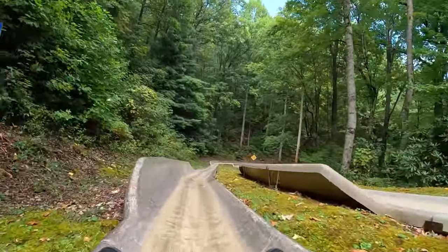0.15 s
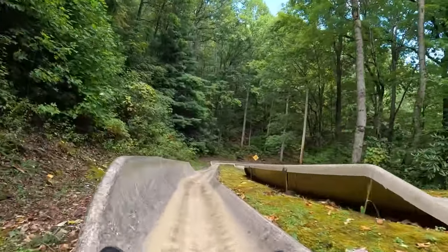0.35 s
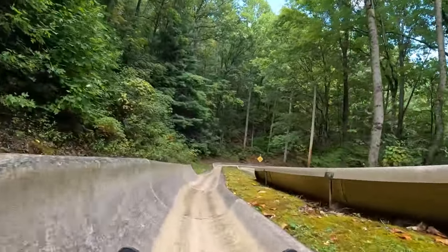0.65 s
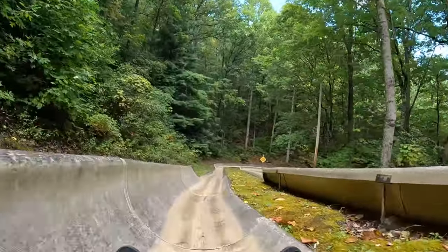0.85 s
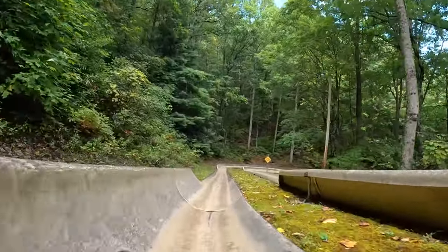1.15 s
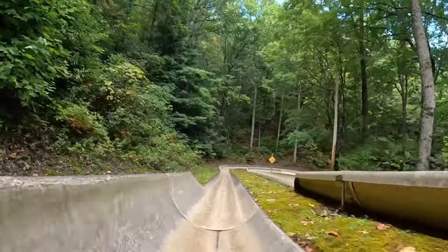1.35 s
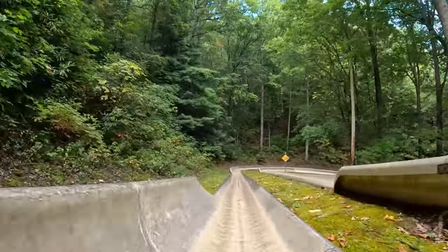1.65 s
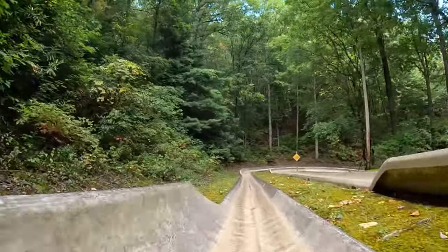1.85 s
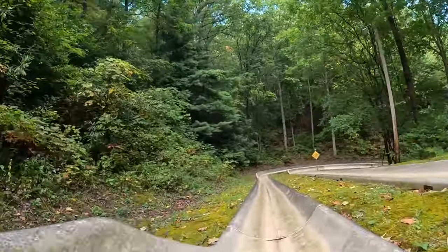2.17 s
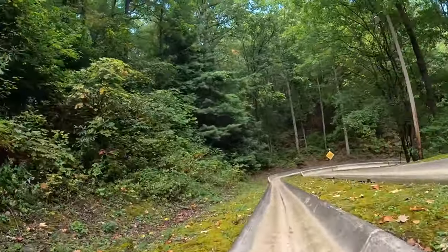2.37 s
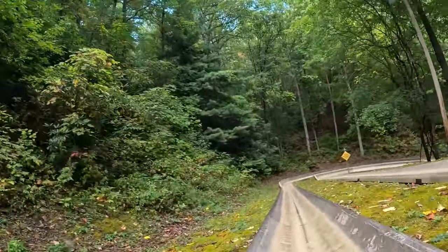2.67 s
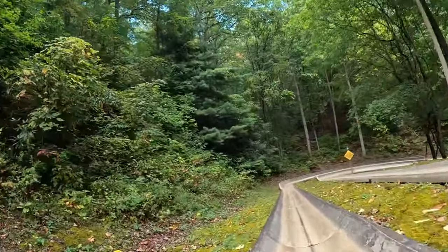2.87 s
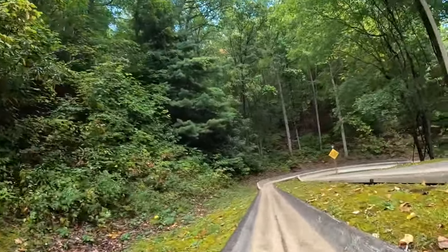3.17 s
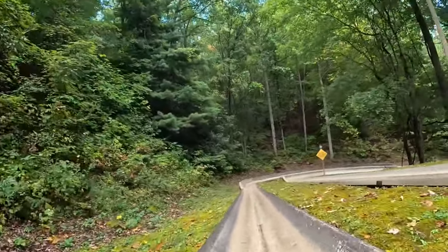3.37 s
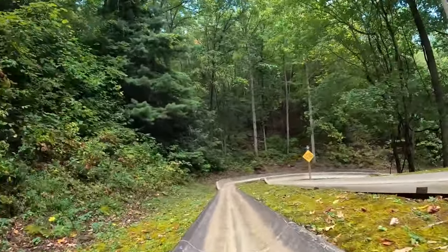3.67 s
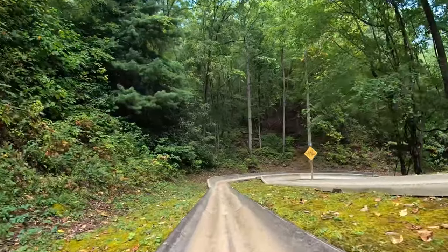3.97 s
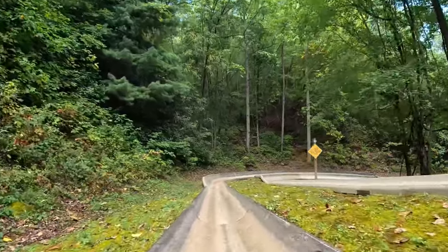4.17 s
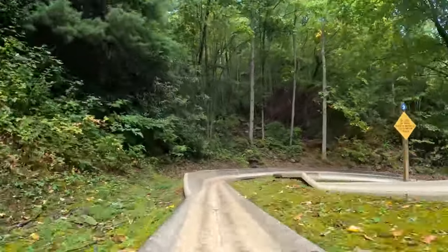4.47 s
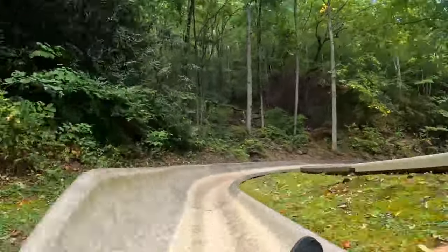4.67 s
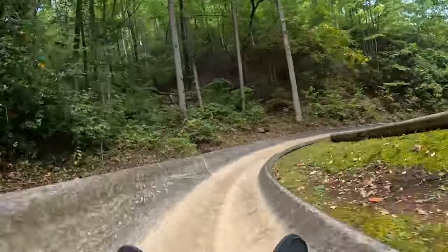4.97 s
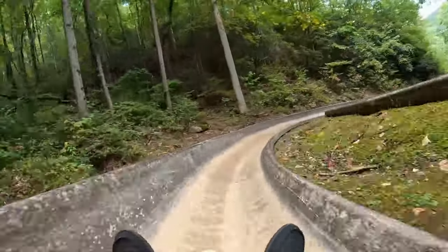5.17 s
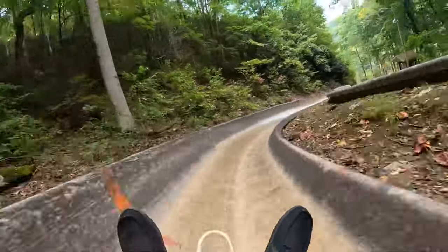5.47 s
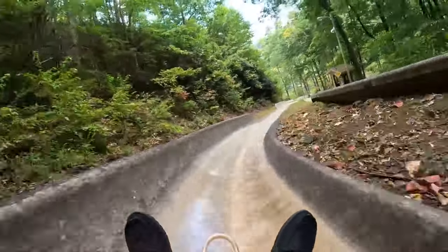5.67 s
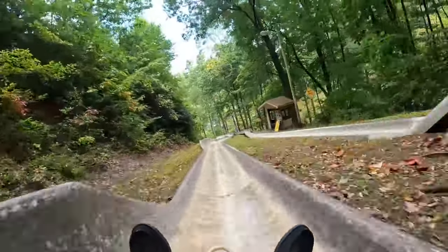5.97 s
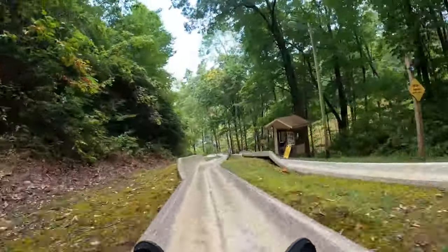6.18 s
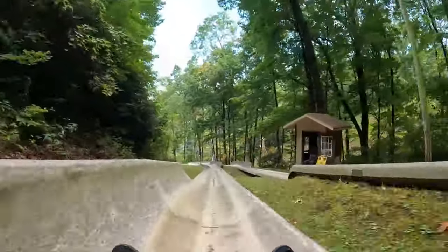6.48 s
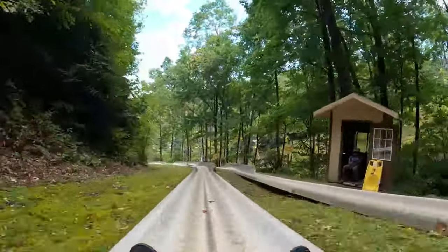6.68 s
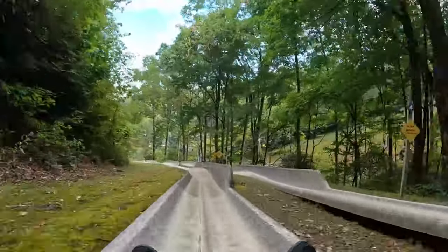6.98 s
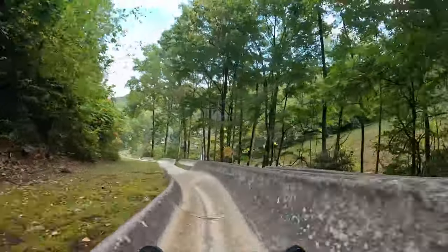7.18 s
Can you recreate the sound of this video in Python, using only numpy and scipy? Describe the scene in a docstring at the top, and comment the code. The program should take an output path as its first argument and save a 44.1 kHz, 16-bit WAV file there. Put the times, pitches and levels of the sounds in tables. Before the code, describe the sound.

Sled wheels roll on rough concrete with a low hollow rumble and a raspy, hissing scrape, picked up by a slightly dull on-board microphone. Hard, uneven thumps and clacks hit as the sled crosses track joints and briefly hops. After a tiny dropout a little past the middle, the ride goes on softer, the bumps shorter and closer together, with a faint phasey swirl between left and right.

```python
"""Wheeled sled in a concrete trough

The wheels rumble through the sled's hollow body, scrape on the gritty surface and bang over the
joints, hopping off the track for a moment after a hard one. A microphone in a housing rides along.
At 4.2 s the sound drops out for an instant. From there it plays sped up, at the same pitch: the cracks
are brighter and patches of the spectrum slip out of phase between left and right."""
import sys
import numpy as np
from scipy import signal
from scipy.fft import rfft, irfft, next_fast_len
from scipy.io import wavfile
from scipy.ndimage import uniform_filter1d

SR = 44100
rng = np.random.default_rng(int(sys.argv[2]) if len(sys.argv) > 2 else 0)


def store_wav(level_fs):
    """Save 16-bit WAV to argv[1]."""
    pcm = np.round(np.clip(np.atleast_2d(level_fs), -1, 1) * 32767)
    wavfile.write(sys.argv[1], SR, pcm.T.astype(np.int16))


N = 323253
TIME_S = np.arange(N) / SR
SPED_UP_FROM_S = 4.2027


def undb(db):
    """Decibels to gain."""
    return 10 ** (np.asarray(db) / 20)


def unit(x):
    """Scale to rms 1."""
    return x / np.sqrt(np.mean(x ** 2))


def curves(table):
    """Interpolate each column after the time column to one value per sample."""
    times_s, *columns = np.transpose(table)
    return [np.interp(TIME_S, times_s, column) for column in columns]


def walk(rate_hz):
    """Random levels, held and smoothed twice; spread near 1."""
    hold = int(SR / rate_hz)
    steps = np.repeat(rng.standard_normal(N // hold + 1), hold)
    return 1.01 * uniform_filter1d(uniform_filter1d(steps, hold), hold)[:N]


def grains(per_s, scatter_db):
    """Random knocks at rms 1; positive scatter makes a few much larger than the rest."""
    hit = rng.random(N) < per_s / SR
    return unit(hit * rng.standard_normal(N) * undb(scatter_db * rng.exponential(size=N)))


def soften(x, hz):
    """A soft contact spreads each push in time and loses the treble."""
    return signal.lfilter(*signal.butter(2, hz, fs=SR), x)


def ring(x, modes, tilt_db=0, width_scale=1):
    """Parallel resonances of alternating sign; tilt_db adds to each one's level."""
    tilt_db = np.broadcast_to(tilt_db, (len(modes), len(x)))
    out = np.zeros(len(x))
    for k, (hz, width_hz, db) in enumerate(modes):
        resonance = signal.iirpeak(hz, hz / width_hz / width_scale, SR)
        out += (-1) ** k * undb(db + tilt_db[k]) * signal.lfilter(*resonance, x)
    return out


def add(out, start_s, sound, db, window_s):
    """Mix in a sound with its loudest window at db rms."""
    start = int(start_s * SR)
    peak_power = uniform_filter1d(sound ** 2, int(window_s * SR)).max()
    out[start:start + len(sound)] += undb(db) * sound / np.sqrt(peak_power)


# Hollow body modes and the higher growl. Each row: frequency in Hz, width in Hz, level in dB.
BODY_MODES = [(98.4, 71, -13), (137.4, 62, -4.5), (179.2, 22, 0), (213.3, 23.3, 0.5), (259.4, 31.3, -1),
              (306.1, 23.1, 0), (357, 50, 0.5), (410.3, 124, -3.5), (525.5, 61, -4)]
GROWL_MODES = [(619.5, 117, -1), (778, 192, 2), (890, 334, -1)]
# Steady rolling. Each row: time in seconds, body in dB, growl in dB, scrape in dB, hiss in dB re scrape.
ROLLING_LEVELS = [(0, -26.5, -34, -34, -7), (.14, -26.5, -31.5, -34.5, -8), (.38, -27, -28.5, -34, -8),
                  (.8, -26.5, -34, -37.5, -9.5), (1.1, -28, -31.5, -37.5, -4),
                  (1.27, -22, -30.5, -36.5, -13.5), (1.6, -27.5, -35, -38.5, -7.5),
                  (1.85, -22, -28.5, -35, -9), (2.3, -28.5, -34, -40.5, -5.5),
                  (2.6, -26.5, -32, -34.5, -6.5), (3.0, -28, -32.5, -37, -9.5),
                  (3.6, -22, -31.5, -34.5, -8), (3.82, -25, -33.5, -35, -8.5),
                  (3.98, -23, -28.5, -27.5, -12), (4.2, -20, -32.5, -35, -6), (4.25, -30, -39, -43.5, -12),
                  (4.9, -31.5, -32, -42.5, -10), (5.3, -30, -41.5, -42, -9.5),
                  (5.7, -28.5, -36.5, -39.5, -9), (6.0, -30, -35.5, -39, -9.5),
                  (6.22, -29.5, -33, -33.5, -11), (6.32, -29.5, -36, -41.5, -10),
                  (6.6, -32.5, -38, -44, -7.5), (7.0, -26, -32.5, -41.5, -6.5),
                  (7.33, -26.5, -35, -34, -13)]


def rumble(roughness):
    """Small surface steps knock the body and feed the growl; the body rolls harder after a thud."""
    body_db, growl_db, _, _ = curves(ROLLING_LEVELS)
    knocks = grains(per_s=900, scatter_db=1.2) * undb(1.6 * roughness + 1.1 * walk(30))
    knocks = soften(knocks, hz=1260)
    rebound = undb(-16) * swell(THUD_COLUMN, rise_s=0.0042, fall_s=0.024)
    body_gain = undb(body_db + 0.31 * hop_db()) + rebound
    growl_gain = undb(growl_db + 0.82 * hop_db())
    return body_gain * unit(ring(knocks, BODY_MODES)) + growl_gain * unit(ring(knocks, GROWL_MODES))


# Resonances of the scrape and its hiss. Each row: frequency in Hz, width in Hz, level in dB.
GRIT_MODES = [(1507, 485, 3.5), (2050, 374, 6.5), (2404, 590, 3.5), (3494, 760, 3.5), (4400, 2110, -8.5)]
HISS_MODES = [(4960, 1140, -2), (7290, 2930, -12.5)]
# Swell of the scrape's ring near 3.5 kHz. Each row: time in seconds, gain in dB.
GRIT_SHINE = [(0, 0.5), (1.05, 1), (1.24, 0), (1.35, 0.5), (2.8, -1), (3.0, 5), (3.1, 1.5), (3.19, 3.5),
              (3.3, 0), (7.33, -1)]


def scrape(roughness):
    """Dense, patchy grit under the wheels: quieter in a hop, louder as they dig in around a crack."""
    _, _, scrape_db, hiss_db = curves(ROLLING_LEVELS)
    grit = grains(per_s=9000, scatter_db=-0.1) * undb(0.21 * roughness + 2.2 * walk(70))
    hiss = unit(unit(ring(grit, HISS_MODES)) + undb(4.5) * grit) * undb(1.4 * walk(14))
    colour_db = 1.26 * np.array([walk(9) for _ in GRIT_MODES])
    colour_db[3] += curves(GRIT_SHINE)[0]
    rasp = unit(ring(soften(grit, hz=6700), GRIT_MODES, colour_db))
    contact = undb(scrape_db + hop_db() + 0.53 * walk(5.4))
    dig_in = undb(-28) * swell(CRACK_COLUMN, rise_s=0.075, fall_s=0.016)
    return (contact + dig_in) * (rasp + undb(hiss_db) * hiss)


# Wheel blows on joints and stones. Each row: time in seconds, thud level in dB, centre in Hz,
# rattle T60 in seconds, crack level in dB.
WHEEL_BLOWS = [(0.189, -17.5, 390, 0.53, -39), (0.296, -21, 296, 0.15, -37), (0.383, -2.5, 330, 0.1, -16),
               (0.498, -3, 301, 0.14, -36), (0.636, -10, 210, 0.2, -34), (0.67, -13, 198, .3, -53),
               (1.162, -23.5, 304, 0.14, -42), (1.199, -12, 416, 0.36, -21.5), (1.243, -25, 400, .1, -25.5),
               (1.288, -4, 242, 0.094, -43), (1.362, -20.5, 400, 0.14, -33), (1.389, -14, 374, 0.16, -26.5),
               (1.435, -6.5, 216, 0.31, -32.5), (1.579, -12.5, 197, 0.41, -45),
               (1.866, -4.5, 328, 0.3, -15.5), (1.873, -10.5, 146, 0.17, -48),
               (1.971, -4.5, 310, 0.14, -33.5), (1.979, -8.5, 335, 0.33, -23),
               (2.041, -15.5, 244, 0.19, -38), (2.098, -6.5, 280, 0.2, -31), (2.104, -10, 115.3, .2, -26.5),
               (2.127, -9, 310, 0.25, -30.5), (2.311, -21.5, 300, 0.079, -36),
               (2.405, -19.5, 287, 0.33, -27), (2.5, -15.5, 243, 0.2, -28.5), (2.611, -15, 448, 0.057, -35),
               (2.699, -1.5, 202, 0.46, -17), (2.825, -4, 175, 0.35, -34), (3.147, -19, 302, 0.12, -31),
               (3.242, -19.5, 350, .08, -34), (3.284, -17, 265, 0.33, -29.5), (3.339, -4, 210, 0.11, -16),
               (3.424, -7.5, 290, 0.053, -50), (3.512, -13, 400, 0.24, -27), (3.555, -8.5, 220, 0.2, -43),
               (3.589, -16, 300, .2, -47), (3.653, -24, 250, 0.3, -27), (3.864, -14.5, 310, 0.77, -36),
               (4.036, -3.5, 314, 0.064, -16), (4.141, -4.5, 312, 0.096, -28), (4.224, -26, 306, 0.18, -48),
               (4.377, -19.5, 297, .1, -38.5), (4.46, -24, 398, .1, -39), (4.544, -12.5, 273, 0.18, -29),
               (4.585, -13, 242, .27, -51), (4.654, -21, 200, .1, -51), (4.684, -9, 254, 0.12, -27),
               (4.739, -12.5, 211, 0.027, -27.5), (4.852, -20.5, 312, 0.12, -32.5),
               (4.878, -16.5, 284, 0.11, -37), (4.897, -16.5, 230, 0.052, -48),
               (5.018, -13, 295, 0.12, -27), (5.042, -28, 308, 0.073, -51),
               (5.059, -14.5, 210, 0.082, -33.5), (5.177, -12, 330, 0.1, -28),
               (5.222, -14, 270, 0.082, -50), (5.319, -27, 284, 0.1, -26.5), (5.335, -18, 252, .1, -35),
               (5.359, -21, 250, 0.073, -51), (5.389, -17, 225, 0.1, -36.5),
               (5.449, -27.5, 280, .08, -38.5), (5.494, -14, 300, 0.1, -35), (5.52, -14, 200, .1, -48),
               (5.551, -21, 280, .1, -40), (5.602, -29, 260, 0.084, -36), (5.704, -13.5, 249, 0.16, -29),
               (5.808, -15, 243, 0.15, -30), (5.826, -17, 260, .06, -41), (5.857, -15.5, 272, .06, -32.5),
               (5.96, -18.5, 330, 0.3, -27.5), (6, -19, 240, .08, -49), (6.034, -34, 300, 0.09, -30),
               (6.085, -23, 300, .1, -32), (6.107, -15, 320, .15, -27.5), (6.134, -20.5, 210, .09, -46),
               (6.145, -21, 230, .09, -49), (6.25, -14, 330, .06, -23), (6.271, -21, 200, 0.06, -47),
               (6.289, -18, 135, .15, -52), (6.387, -14, 360, 0.061, -27.5), (6.411, -18, 233, .1, -55),
               (6.522, -11.5, 330, 0.18, -28), (6.547, -13.5, 199, 0.19, -37.5),
               (6.577, -23.5, 300, 0.068, -44), (6.638, -15.5, 246, 0.056, -43),
               (6.66, -14.5, 210, 0.08, -44), (6.74, -22, 250, .06, -37), (6.762, -15, 290, 0.099, -27),
               (6.777, -20.5, 240, .1, -48), (6.874, -17, 199, 0.19, -39), (6.902, -10.5, 330, 0.052, -32),
               (6.928, -12.5, 260, 0.16, -41), (7.051, -14, 330, 0.08, -34.5), (7.076, -15, 215, 0.16, -45),
               (7.23, -18.5, 226, .12, -52), (7.32, -17, 300, .1, -37)]
THUD_COLUMN, CRACK_COLUMN = 1, 4
FRAME_SWAY = (72, 29, -8.5)  # frequency in Hz, width in Hz, level in dB


def thuds():
    """Each blow is a firm push and a dying rattle that ring the sled's modes near its centre."""
    out = np.zeros(N + SR)
    t = np.arange(SR // 4) / SR
    modes = [FRAME_SWAY] + BODY_MODES + GROWL_MODES
    mode_hz = np.array(modes)[:, 0]
    for at_s, db, centre_hz, t60_s, _ in WHEEL_BLOWS:
        if at_s < SPED_UP_FROM_S:
            rolloff_db, rattle_db, width_scale, lead_s = 7, -3, 0.81, 0.003447
        else:  # shorter and cleaner in the sped-up part
            rolloff_db, rattle_db, width_scale, lead_s = 12, -9, 1.4, 0.007
        push = 3.2 * np.exp(-t / 0.00047)
        envelope = np.minimum(t / 0.0069, 1) * np.exp(-np.log(1000) * t / t60_s)
        rattle = undb(rattle_db) * rng.standard_normal(len(t)) * envelope
        scatter_db = 3 * rng.standard_normal(len(modes))  # each blow lands elsewhere
        tilt_db = scatter_db - rolloff_db * np.log2(mode_hz / centre_hz) ** 2
        thud = ring(soften(push + rattle, hz=1200), modes, tilt_db[:, None], width_scale)
        add(out, at_s - lead_s, thud, db, window_s=0.0017)
    return out[:N]


def swell(level_column, rise_s, fall_s):
    """Gain that grows towards each blow and dies after it, as strong as the blow."""
    return sum(undb(db) * np.exp(np.minimum((TIME_S - at_s) / rise_s, (at_s - TIME_S) / fall_s))
               for at_s, db in np.array(WHEEL_BLOWS)[:, [0, level_column]])


# Resonances of a crack. Each row: frequency in Hz, width in Hz, level in dB.
SNAP_MODES = [(940, 365, 8), (2050, 1210, 1.5), (3630, 840, -0.5), (5850, 1100, -13), (11300, 3200, -21)]


def cracks():
    """A wheel edge meets a joint: grit crunches up to a snap, smeared and brighter in the sped-up part."""
    out = np.zeros(N + SR)
    t = np.arange(-SR // 50, SR // 30) / SR
    octaves = np.log2(np.array(SNAP_MODES)[:, :1] / 2000)
    for at_s, *_, db in WHEEL_BLOWS:
        sped_up = at_s >= SPED_UP_FROM_S
        rise_s, fall_s, db_per_octave = (0.0035, 0.002, 1) if sped_up else (0.0012, 0.0025, 0)
        envelope = np.exp(np.minimum(t / rise_s, -t / fall_s)) + 0.05 * np.exp(-abs(t) / 0.015)
        crunch = soften(rng.standard_normal(len(t)) * envelope, hz=6950)
        add(out, at_s + t[0], ring(crunch, SNAP_MODES, db_per_octave * octaves), db, window_s=0.0089)
    return out[:N]


# Wheels off the track. Each row: take-off in seconds, touchdown in seconds, contact loss in dB.
WHEEL_HOPS = [(0.399, 0.508, 17), (0.513, 0.64, 10), (1.3, 1.376, 10.5), (1.879, 1.98, 22),
              (1.991, 2.092, 11), (2.16, 2.236, 3), (2.721, 2.8, 8), (3.064, 3.16, 5.5), (3.342, 3.422, 10),
              (4.032, 4.154, 20.5), (4.158, 4.219, 14.5), (4.41, 4.463, 4.5), (4.579, 4.62, 13),
              (4.763, 4.872, 10), (4.894, 5.01, 10), (5.365, 5.483, 9), (5.184, 5.206, 6),
              (5.516, 5.601, 9), (5.665, 5.694, 8.5), (5.718, 5.797, 4.5), (5.835, 5.87, 13),
              (5.972, 6.012, 5), (6.107, 6.147, 14), (6.231, 6.301, 12), (6.387, 6.427, 8.5),
              (6.526, 6.573, 7), (6.912, 6.979, 7.5), (7.056, 7.106, 7.5), (7.117, 7.17, 7.5),
              (7.244, 7.3, 5)]


def hop_db(lift_s=0.014, settle_s=0.029):
    """Wheel contact falls after take-off and is back at 0 dB by touchdown."""
    return -sum(loss_db * np.clip(np.minimum((TIME_S - off_s) / lift_s, (down_s - TIME_S) / settle_s), 0, 1)
                for off_s, down_s, loss_db in WHEEL_HOPS)


# Response of the microphone's housing. Each row: frequency in Hz, gain in dB.
HOUSING_RESPONSE = [(20, -27), (60, 0), (110, 1), (6000, -6.5), (8000, -2.5), (9200, -18.5), (10200, -12.5),
                    (11200, -24), (12000, -22), (15000, -43)]


def housing(x):
    """The housing around the microphone colours the sound and dulls the top treble."""
    size = next_fast_len(N)
    bin_hz = np.arange(size // 2 + 1) * SR / size
    hz, db = np.transpose(HOUSING_RESPONSE)
    gain = undb(np.interp(np.log(bin_hz + 1), np.log(hz), db))
    return irfft(rfft(x, size) * gain, size)[:N]


def dropout(fade_s=0.02):
    """Gain that drops to zero as the sped-up part starts, then fades back in."""
    since_s = TIME_S - SPED_UP_FROM_S
    return np.where(since_s < 0, 1, np.clip(since_s / fade_s, 0, 1) ** 2)


# Main phase slips of the right channel. Each row: start in seconds, low edge in Hz, high edge in Hz,
# low edge drift in Hz per second, phase lag in radians.
PHASE_SLIPS = [(4.27, 1350, 1750, -250, 2.2), (4.3, 2050, 2450, 0, -2), (4.53, 750, 790, -5000, -2.5),
               (4.62, 1750, 2200, 0, 3), (4.7, 2200, 2550, 0, .8), (4.87, 1800, 2800, 0, -1.1),
               (5.05, 800, 1200, -1500, 0), (5.17, 1750, 2000, 0, -2.5), (5.3, 720, 1200, 0, -2.7),
               (5.31, 0, 720, 0, -1.9), (5.42, 1850, 2900, 0, .6), (5.72, 2050, 2550, 0, -2.7),
               (5.86, 1050, 1150, -2000, 2.95), (5.85, 1650, 2050, 0, .2), (5.93, 0, 550, 0, 1.6),
               (5.93, 1060, 1600, -1700, 2.5), (6.08, 0, 480, 0, -1.1), (6.11, 950, 1400, 2500, 2.9),
               (6.14, 620, 800, -1150, 3.05), (6.15, 860, 1000, -1250, 2.5), (6.16, 1450, 1950, 0, .7),
               (6.3, 980, 1350, -500, 1.2), (6.31, 1350, 1520, 0, -2.4), (6.38, 1680, 2900, 0, .5),
               (6.5, 1150, 1650, 0, -1.1), (6.5, 0, 450, 0, -1.1), (6.72, 1050, 1450, 0, 1.4),
               (6.76, 1450, 2300, 0, 2.4), (6.93, 1900, 2600, 0, -2), (7.07, 430, 1000, 0, -1.9)]


def phase_slips(x):
    """Ragged patches of the spectrum jump to a phase of their own and hold it until overlaid."""
    hz, frame_s, spectrum = signal.stft(x, SR, nperseg=2048, noverlap=1792)
    patches = list(PHASE_SLIPS)
    for when, height, width, turn in rng.random((450, 4)):  # narrow treble patches
        start_s = SPED_UP_FROM_S + 0.04 + 3.4 * when ** 1.3
        low_hz = 2600 + 12600 * height
        patches.append((start_s, low_hz, low_hz + 100 + 400 * width, 0, 2 * np.pi * turn))
    wobbles = 140 * uniform_filter1d(rng.standard_normal((len(patches), 2, len(frame_s))), 14, axis=2)
    lag = np.zeros(spectrum.shape)
    for (start_s, low_hz, high_hz, drift_hz_per_s, radians), wobble in zip(sorted(patches), wobbles):
        first = np.searchsorted(frame_s, start_s)
        low_wobble_hz, high_wobble_hz = wobble[:, first:] * (1 + low_hz / 2500)
        drifted_hz = low_hz + drift_hz_per_s * (frame_s[first:] - start_s)
        bottom_hz = np.where(drifted_hz > 0, drifted_hz + low_wobble_hz, -1)
        if not drift_hz_per_s:
            bottom_hz = np.maximum(bottom_hz, 0.8 * low_hz - 200)
        top_hz = np.minimum(high_hz + high_wobble_hz, 1.2 * high_hz + 200)
        inside = (hz[:, None] >= bottom_hz) & (hz[:, None] < top_hz)
        lag[:, first:][inside] = radians
    return signal.istft(spectrum * np.exp(-1j * lag), SR, nperseg=2048, noverlap=1792)[1][:N]


def scene():
    """The sled as one mono source; rumble and scrape share the track's roughness."""
    roughness = walk(14)
    return rumble(roughness) + scrape(roughness) + thuds() + cracks()


def record(dry):
    """Housing, soft overload, dropout, phase slips on the right and a steep low-pass."""
    overloaded = np.tanh(0.86 * housing(dry)) / 0.77
    left = overloaded * dropout()
    right = phase_slips(left)
    low_pass = signal.ellip(8, 0.2, 70, 15200, fs=SR, output="sos")
    return signal.sosfilt(low_pass, np.array([left, right]))


dry = scene()
out = record(dry)
store_wav(out)
```